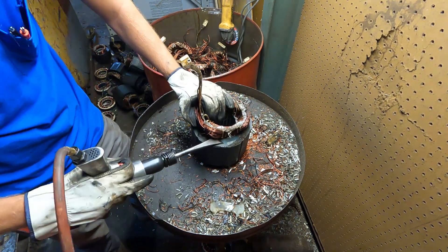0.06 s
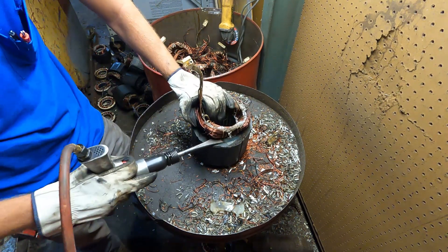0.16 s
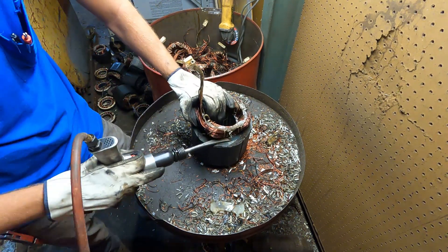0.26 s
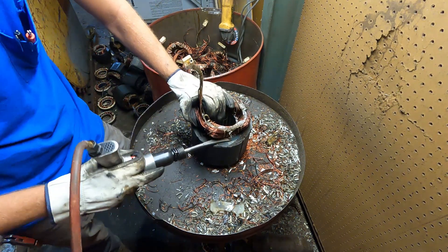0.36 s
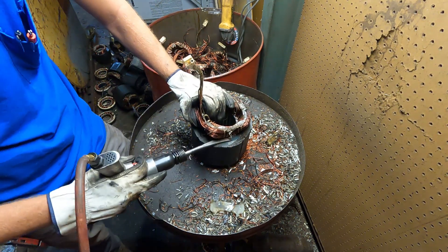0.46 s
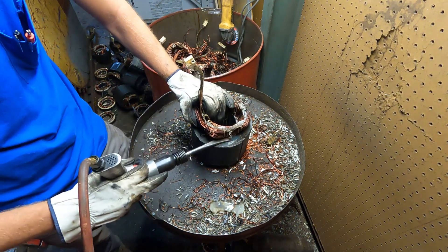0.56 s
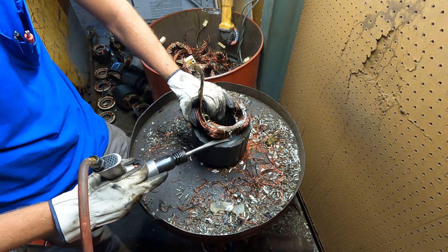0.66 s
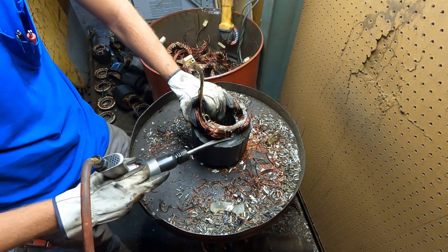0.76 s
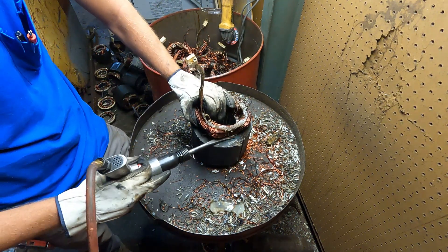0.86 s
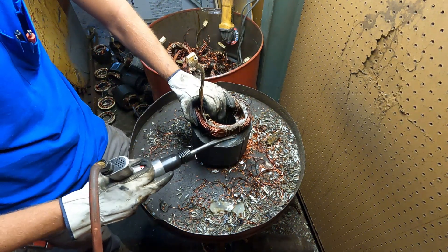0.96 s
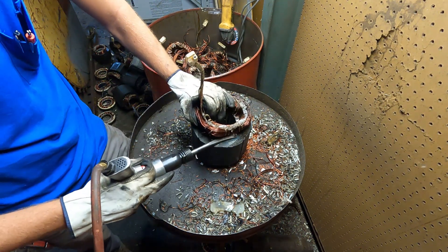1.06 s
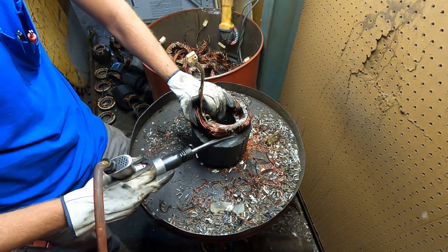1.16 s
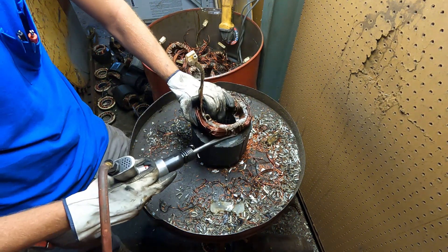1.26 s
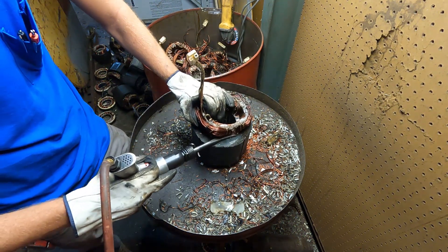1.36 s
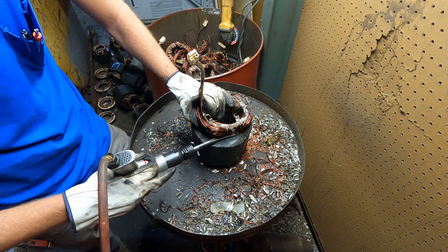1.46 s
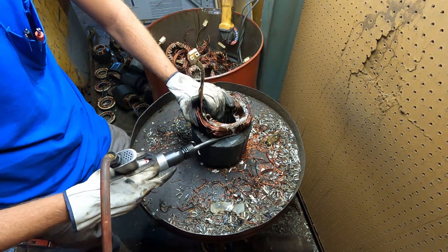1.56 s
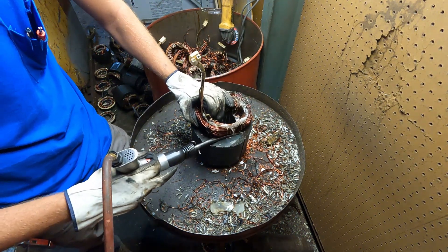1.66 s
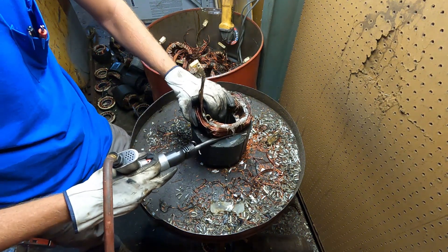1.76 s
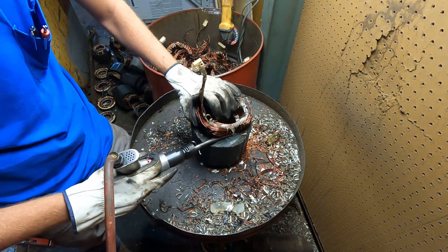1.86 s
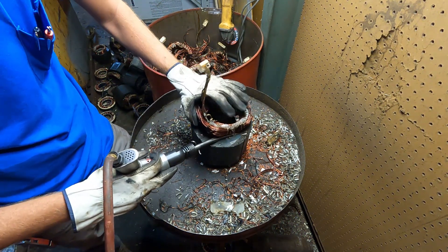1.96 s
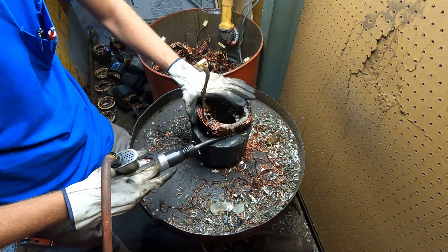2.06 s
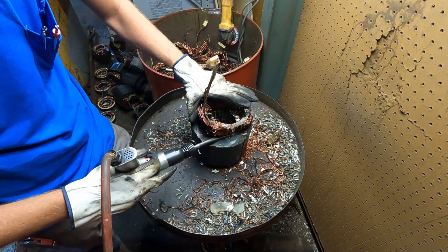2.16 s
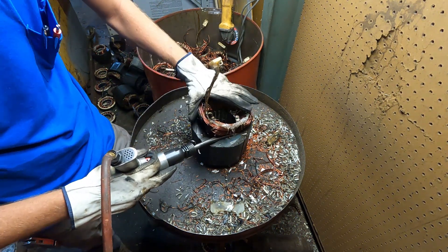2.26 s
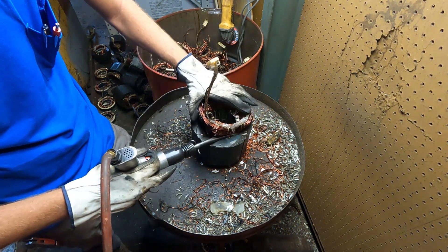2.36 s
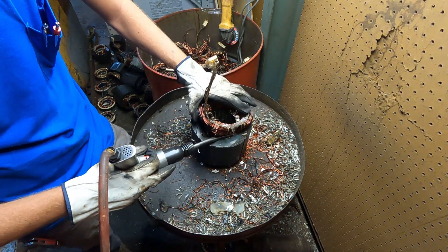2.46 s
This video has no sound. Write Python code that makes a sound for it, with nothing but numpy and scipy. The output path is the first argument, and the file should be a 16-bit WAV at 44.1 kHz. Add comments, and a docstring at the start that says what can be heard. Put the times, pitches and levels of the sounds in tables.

```python
"""After a faint clink, a pneumatic chisel hammers a steel motor housing: sputter, short burst, halting strokes.
A bright skid and a pause precede the long burst, which ends in two weak strokes; then light clinks and a scrape.
Each stroke is a filtered exhaust pulse plus a clash of decaying noise and damped modes; gated noise is the air.
A hard-walled room adds a noise tail that decays per frequency; low rumble and hum run throughout."""
import sys
import numpy as np
from scipy import signal
from scipy.fft import rfft, irfft, next_fast_len
from scipy.io import wavfile
from scipy.ndimage import uniform_filter1d

SR = 44100
rng = np.random.default_rng(int(sys.argv[2]) if len(sys.argv) > 2 else 0)


def materialize(psi):
    """Save the field psi as 16-bit PCM at rate SR to the path in sys.argv[1].

    A 1-D psi becomes a single channel; in a 2-D psi each row is a channel.
    """
    bounded = np.clip(np.atleast_2d(psi).T, -1, 1)
    quanta = np.round(bounded * 32767).astype(np.int16)
    wavfile.write(sys.argv[1], SR, quanta)


N = 110250

# Free-running piston: t/s, rate/(strokes/s), level/dB
SHORT_BURST = [(.2802, 45.5, -0.5), (.325, 46.6, -1.5), (.36, 46.3, -5), (.395, 38.3, -9)]
LONG_BURST = [(.8706, 51.84, -0.5), (1.0, 51.09, -2.5), (1.17, 50.5, -2.5), (1.26, 50.06, -2.5),
              (1.53, 49.71, -2), (1.75, 49.6, -2.5), (1.8, 41.55, -3)]
# Halting low-pressure strokes: t/s, puff level/dB, clash level/dB, clash offset from t/s
SPUTTERS = [(.226, -16.5, -7, -.005), (.249, -1, 4.5, -0.0054), (.267, -4.5, 6.5, -.004),
            (0.44, -14.5, -14, -0.0013), (0.484, -6, 2.5, .001), (0.531, -4.5, 4, .002),
            (0.585, -17, -6.5, .005), (0.811, -15, -18, -0.0074), (0.829, -11.5, -3, -0.0093),
            (0.844, -4.5, 2.5, -.004), (0.857, -13, 5.5, -.001), (1.823, -4.5, -6.5, -.003),
            (1.868, -12.5, -5, 0.00053)]
# Exhaust puff spectra: f/Hz, relative level/dB
LONG_PUFF = [(20, -19), (50, -12.5), (100, 0), (150, -7.5), (200, -10.5), (250, -3.5), (340, -2),
             (400, -3.5), (460, -4.5), (580, -11), (720, -21.5), (900, -17.5), (1200, -43), (3000, -89),
             (12000, -110)]
SHORT_PUFF = [(20, -57), (50, -23), (90, 3), (180, 1), (230, 5.5), (320, -2), (450, 0), (700, -16.5),
              (1100, -25), (3000, -85), (12000, -110)]
WEAK_PUFF = [(20, -15), (60, -7.5), (130, 5), (200, -3), (330, 0), (500, 1.5), (620, -17), (760, -6),
             (1000, -17), (1200, -11), (1600, -95), (4000, -38), (12000, -110)]
# Chisel-on-housing clash spectra: f/Hz, relative level/dB
BRIGHT_STEEL = [(410, -23), (700, -14), (850, 10.5), (1050, -19.5), (1190, -5), (1760, -1), (1950, 4.5),
                (2160, -4.5), (3270, -2.5), (3540, -6), (7700, -8), (11400, -17.5), (15500, -21)]
DULL_STEEL = [(410, -37), (700, -0.5), (873, -5), (943, -3.5), (1270, -3), (1580, -4.5), (1950, 3),
              (2190, -2.5), (2770, -3), (3070, -2), (4030, -12), (5500, -7), (7700, -11), (8320, -16),
              (10900, -19.5), (13400, -33.5), (15500, -69)]
LOOSE_STEEL = [(410, -3.5), (700, 1.5), (955, -8), (1150, -20), (1300, -16.5), (2080, -5.5), (2630, -18),
               (2990, -7.5), (3580, -11.5), (8110, -12.5), (12300, -36), (15500, -46)]
# Modes of housing and chisel: f/Hz, relative level/dB, t60/s
HOUSING = [(1410, 4.5, 0.12), (1990, 3.5, 0.098), (2073, 5.5, 0.14), (2410, 6, 0.24), (2630, 3, .08),
           (2970, 1, 0.17)]
# Modes of the tool, chisel not pressed home: f/Hz, relative level/dB, t60/s
HOLLOW = [(465, 2, 0.11), (678, -2, 0.038), (767, -3.5, 0.063), (1129, 5.5, 0.086)]
SKID_HZ = 8060  # spectral peak of the skid
# Bright rasp of the slipping blade: f/Hz, relative level/dB
SKID = [(1100, -30), (1900, -11.5), (6500, -11), (8200, -9.5), (SKID_HZ, 0), (8800, -15.5), (15500, -36)]
# Exhaust hiss spectrum: f/Hz, relative level/dB
HISS = [(300, -33), (1500, -8), (4000, 1), (6500, 2.5), (8000, -2), (11000, -12.5), (15000, -33)]
# Exhaust buffeting spectrum: f/Hz, relative level/dB
DRAUGHT = [(15, -22), (35, -2.5), (60, -6.5), (120, -8.5), (300, -19.5), (800, -28), (2000, -91)]
# Air flow periods: start/s, end/s, relative level/dB
AIR_OPEN = [(0.208, 0.377, 6), (0.416, 0.584, -4), (0.81, 1.802, 3.5)]
# Light metal contacts: t/s, level/dB, tick t60/s, knock f/Hz, knock level re contact/dB
CLINKS = [(.012, -26, 0.044, 3536, -8), (.108, -62, 0.034, 3520, -4), (.148, -54, .04, 3460, -8),
          (2.136, -28.5, .04, 3595, -4), (2.268, -27, .03, 2140, -1), (2.3551, -6.5, 0.027, 1373, -4.5),
          (2.366, -17, 0.08, 1250, -10), (2.47, -20.5, 0.076, 2100, -3)]
# Clink tick spectrum: f/Hz, relative level/dB
CLINK = [(500, -43), (900, -15), (1150, -8.5), (1400, -13), (1750, -11), (2700, -9.5), (3700, -9.5),
         (4400, -6.5), (5900, -7), (7100, -15), (10000, -31.5), (15000, -50)]
# Scrape spectrum: f/Hz, relative level/dB
SCRAPE = [(600, -15), (1400, 5), (3600, 7.5), (7000, -2), (14000, -21)]
# Background rumble spectrum: f/Hz, relative level/dB
FLOOR = [(15, -37), (25, -6), (52, 1), (80, -3.5), (115, -4), (160, -12), (370, -19), (500, -24.5),
         (800, -32), (3200, -30), (6000, -36), (10000, -47.5), (16000, -68)]
# Workshop decay: f/Hz, t60/s
ROOM = [(100, 0.31), (300, 0.62), (600, 0.6), (1000, 0.56), (2500, 0.6), (7000, 0.45), (10000, 0.35),
        (15000, 0.29)]
# Stereo side signal: f/Hz, side level/dB
WIDTH = [(100, -100), (1000, -48), (5000, -44.5), (10000, -25.5), (12000, -19.5), (15000, -7)]

LONG_PUFF_DB, SHORT_PUFF_DB, WEAK_PUFF_DB = 13, 17.5, 11.5
PUFF_LAG_S, PUFF_SUDDEN = 0.0012, 0.38  # crest after stroke time; 0 swells evenly, 1 starts at once
REBOUND_S, REBOUND_DB = 0.004446, -8.5  # opposite pulse after the puff
BRIGHT_DB, DULL_DB, LOOSE_DB = 6, 2, 2.5
CLASH_T60_S, SPUTTER_T60_S = 0.051, 0.087
BLOW_RISE_TAU_S = 0.002
REPEAT_SHARE = 0.32  # energy share of rattle noise alike in every stroke
SCATTER_DB, JITTER_S = 1.18, 0.00005  # standard deviations
RING_DB, HOLLOW_DB = -42.5, -25
GRIP_DETUNE = 0.0062  # relative standard deviation
SHANK_HZ, SHANK_DB = 15100, -25
SKID_S, SKID_DB, SKID_T60_S, SKID_RISE_TAU_S = 0.588, -0.5, 0.06, 0.0032
HISS_DB, DRAUGHT_DB = -41, -26
AIR_RISE_TAU_S, AIR_FALL_TAU_S = 0.014, 0.027
CLINK_RISE_TAU_S, KNOCK_T60_S = 0.0016, 0.024
SCRAPE_S, SCRAPE_SIGMA_S, SCRAPE_DB = 2.24, 0.026, -49.5
FLOOR_DB, HUM_DB, HUM_HZ = -48.5, -53.5, 100
WET_PUFF_DB, WET_STEEL_AND_HISS_DB, WET_SPUTTER_DB, WET_CLINK_DB = -9, -2, -10, -11
WALL_DELAY_S = 0.005
CEILING, TOP_HZ, TOP_SLOPE_HZ = 0.92, 15750, 250

T = np.arange(N) / SR
HIT_T = T[:SR // 4]


def chisel():
    """Two bursts of steady strokes: exhaust, steel and shank ring, with room."""
    short, long = strokes(SHORT_BURST), strokes(LONG_BURST)
    exhaust = amp(SHORT_PUFF_DB) * puffs(short, SHORT_PUFF)
    exhaust += amp(LONG_PUFF_DB) * puffs(long, LONG_PUFF)
    steel = clashes(short, BRIGHT_STEEL, BRIGHT_DB, CLASH_T60_S)
    steel += clashes(long, DULL_STEEL, DULL_DB, CLASH_T60_S)
    wet = room(amp(WET_PUFF_DB) * exhaust + amp(WET_STEEL_AND_HISS_DB) * steel)
    return exhaust + steel + shank(short) + wet


def strokes(burst):
    """(t/s, level/dB) per piston stroke, from the integrated stroke rate plus jitter."""
    s, rate, db = np.transpose(burst)
    t = np.arange(s[0], s[-1], 1 / SR)
    turns = np.cumsum(np.interp(t, s, rate)) / SR
    times = np.interp(np.arange(int(turns[-1]) + 1), turns, t)
    jittered = times + JITTER_S * rng.standard_normal(len(times))
    return np.transpose([jittered, np.interp(times, s, db)])


def puffs(blows, spectrum):
    """Exhaust pressure pulse per stroke, then the opposite pulse drawn by the piston's rebound."""
    out = np.zeros(N)
    for s, db in blows:
        crest_s = s + PUFF_LAG_S
        rebound_db = db + REBOUND_DB + rng.normal(0, SCATTER_DB)
        add(out, crest_s, amp([db]))
        add(out, crest_s + REBOUND_S, -amp([rebound_db]))
    return body(out, spectrum, PUFF_SUDDEN)


def clashes(blows, spectrum, level_db, t60_s):
    """Steel on steel: a short noise rattle, partly alike each time, plus the housing modes."""
    rattle = np.zeros(N)
    alike = rng.standard_normal(len(HIT_T))
    envelope = onset(BLOW_RISE_TAU_S) * fade(t60_s)
    for s, db in blows:
        fresh = rng.standard_normal(len(HIT_T))
        grain = np.sqrt(REPEAT_SHARE) * alike + np.sqrt(1 - REPEAT_SHARE) * fresh
        add(rattle, s, amp(db + rng.normal(0, SCATTER_DB)) * impulse(grain * envelope))
    return amp(level_db) * body(rattle, spectrum) + amp(RING_DB) * modes(blows, HOUSING)


def modes(blows, table):
    """Each blow re-excites damped modes; the gloved grip detunes them slightly."""
    out = np.zeros(N)
    rise = onset(BLOW_RISE_TAU_S)
    for s, db in blows:
        tone = np.zeros(len(HIT_T))
        for hz, level_db, t60_s in table:
            detuned_hz = hz * (1 + GRIP_DETUNE * rng.normal())
            tone += amp(db + level_db) * ring(detuned_hz, t60_s)
        add(out, s, rise * tone)
    return out


def shank(blows):
    """Thin high chisel ring before it bites in: one damped mode per stroke."""
    out = np.zeros(N)
    for s, db in blows:
        add(out, s, amp(SHANK_DB + db) * ring(SHANK_HZ + rng.normal(0, 70), 0.07))
    return out


def sputter():
    """Halting strokes as the tool starts and stops: weak puffs, hollow modes, loose clashes, one skid."""
    pushes = [(s, puff_db) for s, puff_db, _, _ in SPUTTERS]
    contacts = [(s + offset_s, clash_db) for s, _, clash_db, offset_s in SPUTTERS]
    dry = amp(WEAK_PUFF_DB) * puffs(pushes, WEAK_PUFF)
    dry += amp(HOLLOW_DB) * modes(pushes, HOLLOW)
    dry += clashes(contacts, LOOSE_STEEL, LOOSE_DB, SPUTTER_T60_S)
    add(dry, SKID_S, amp(SKID_DB) * skid())
    return dry + amp(WET_SPUTTER_DB) * room(dry)


def skid():
    """The blade slips: a decaying noise burst through a bright, peaked filter."""
    grain = rng.standard_normal(len(HIT_T))
    return body(impulse(grain * onset(SKID_RISE_TAU_S) * fade(SKID_T60_S)), SKID)


def air():
    """Spent air while the trigger is held: flow-gated hiss with room, and low-frequency buffeting."""
    flow = np.zeros(N)
    for start_s, end_s, db in AIR_OPEN:
        rise = 1 - np.exp(-np.maximum(T - start_s, 0) / AIR_RISE_TAU_S)
        fall = np.exp(-np.maximum(T - end_s, 0) / AIR_FALL_TAU_S)
        flow += amp(db) * rise * fall
    hiss = amp(HISS_DB) * flow * noise(HISS)
    buffeting = amp(DRAUGHT_DB) * flow * noise(DRAUGHT)
    return hiss + amp(WET_STEEL_AND_HISS_DB) * room(hiss) + buffeting


def handling():
    """Damped clinks of tool and housing (noise tick plus tonal knock), and a brief copper-wire scrape."""
    ticks, knocks = np.zeros(N), np.zeros(N)
    rise = onset(CLINK_RISE_TAU_S)
    for s, db, t60_s, hz, knock_db in CLINKS:
        grain = rng.standard_normal(len(HIT_T))
        add(ticks, s, amp(db) * impulse(grain * rise * fade(t60_s)))
        add(knocks, s, amp(db + knock_db) * impulse(rise * ring(hz, KNOCK_T60_S)))
    dry = body(ticks, CLINK) + knocks + scrape()
    return dry + amp(WET_CLINK_DB) * room(dry)


def scrape():
    """Coloured noise, roughened by a random gain, under a Gaussian envelope."""
    smooth = uniform_filter1d(rng.standard_normal(N), size=130)  # about 3 ms
    roughness = amp(3.6 * unit(smooth))
    envelope = np.exp(-((T - SCRAPE_S) / SCRAPE_SIGMA_S) ** 2 / 2)
    return amp(SCRAPE_DB) * envelope * unit(roughness * noise(SCRAPE))


def workshop():
    """Low rumble as coloured noise, mains hum as a sine."""
    hum = unit(np.sin(2 * np.pi * HUM_HZ * T))
    return amp(FLOOR_DB) * noise(FLOOR) + amp(HUM_DB) * hum


def room(x):
    """Workshop reverberation: delayed noise tail, each frequency with its own decay."""
    hz, t, z = signal.stft(rng.standard_normal(SR), SR, nperseg=256)
    decay = np.exp(-np.log(1000) * t / along(ROOM, hz)[:, None])
    tail = signal.istft(z * decay, SR)[1]
    out = np.zeros(N)
    add(out, WALL_DELAY_S, signal.fftconvolve(x, impulse(tail))[:N])
    return out


def amp(db):
    """Decibels to gain."""
    return 10 ** (np.asarray(db) / 20)


def unit(x):
    """Scale to rms 1."""
    return x / np.sqrt(np.mean(x ** 2) + 1e-20)


def impulse(x):
    """Scale to energy 1."""
    return x / (np.linalg.norm(x) + 1e-20)


def along(points, hz):
    """Interpolate (f/Hz, value) points on a log frequency axis."""
    f, v = np.transpose(points)
    return np.interp(np.log(hz + 1), np.log(f + 1), v)


def filtered(x, response):
    """Apply a zero-phase response of frequency."""
    m = next_fast_len(N + SR // 2)
    return irfft(rfft(x, m) * response(np.fft.rfftfreq(m, 1 / SR)), m)[..., :N]


def noise(spectrum):
    """Coloured noise of rms 1."""
    return unit(filtered(rng.standard_normal(N), lambda hz: amp(along(spectrum, hz))))


def body(x, spectrum, sudden=1, size=8192):
    """Energy-1 filter via cepstrum: sudden 1 is minimum phase, 0 is zero phase and swells first."""
    half = size // 2
    cepstrum = irfft(np.log(amp(along(spectrum, np.fft.rfftfreq(size, 1 / SR)))))
    cepstrum[1:half] *= 1 + sudden
    cepstrum[half + 1:] *= 1 - sudden
    response = np.roll(irfft(np.exp(rfft(cepstrum))), half)
    return signal.fftconvolve(x, impulse(response))[half:][:N]


def onset(tau_s):
    """Exponential rise of a hit towards 1."""
    return 1 - np.exp(-HIT_T / tau_s)


def fade(t60_s):
    """Exponential decay of a hit, 60 dB in t60_s."""
    return np.exp(-np.log(1000) * HIT_T / t60_s)


def ring(hz, t60_s):
    """One damped mode at a random phase."""
    return np.sin(2 * np.pi * (hz * HIT_T + rng.random())) * fade(t60_s)


def add(out, s, x):
    """Mix x into out at time s."""
    part = out[max(round(s * SR), 0):][:len(x)]
    part += x[:len(part)]


def scene():
    """All layers, nearly mono: a decorrelated side signal spreads mainly the highest treble."""
    mid = chisel() + sputter() + air() + handling() + workshop()
    diffuser = impulse(rng.standard_normal(len(HIT_T)) * fade(0.057))
    spread = signal.fftconvolve(mid, diffuser)[:N]
    side = filtered(spread, lambda hz: amp(along(WIDTH, hz)))
    return np.array([mid + side, mid - side])


def record(dry):
    """Soft limiting towards CEILING, then a steep low-pass reaching zero at TOP_HZ."""
    rounded = dry / (1 + np.abs(dry / CEILING) ** 6) ** (1 / 6)
    return filtered(rounded, lambda hz: np.clip((TOP_HZ - hz) / TOP_SLOPE_HZ, 0, 1) ** 2)


dry = scene()
out = record(dry)
materialize(out)
```